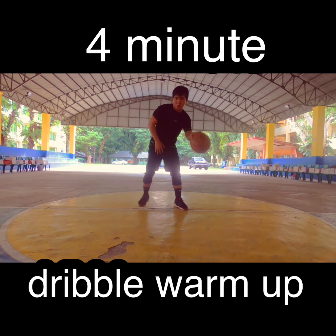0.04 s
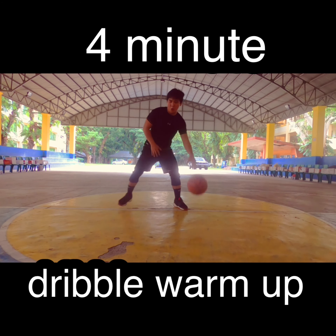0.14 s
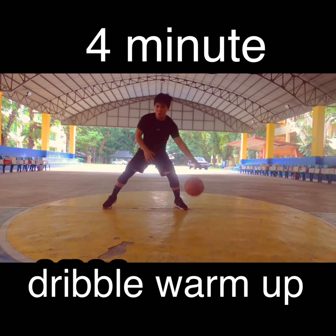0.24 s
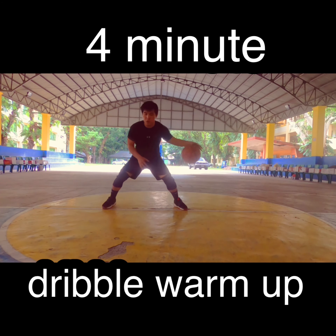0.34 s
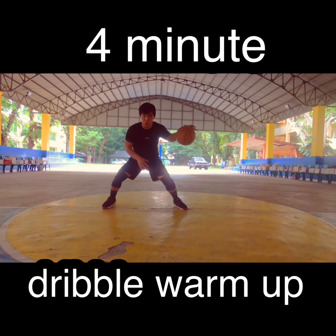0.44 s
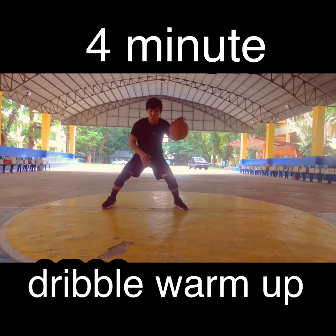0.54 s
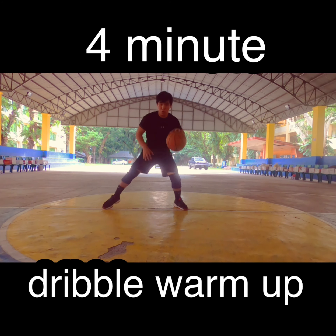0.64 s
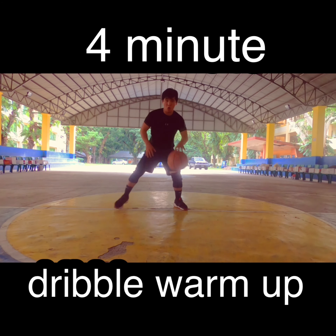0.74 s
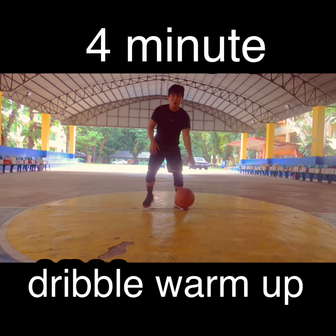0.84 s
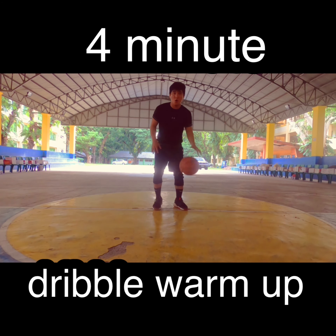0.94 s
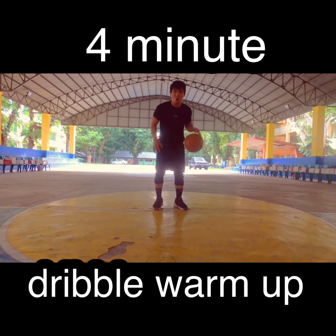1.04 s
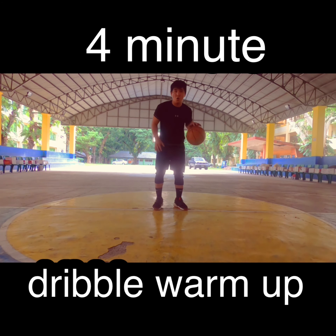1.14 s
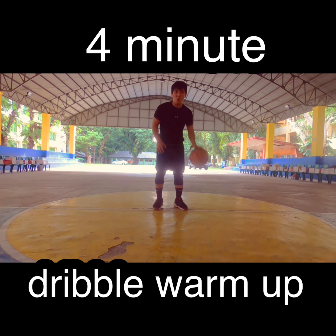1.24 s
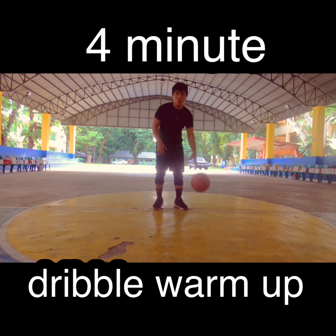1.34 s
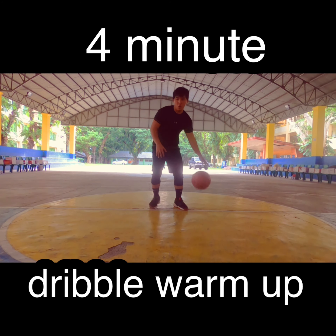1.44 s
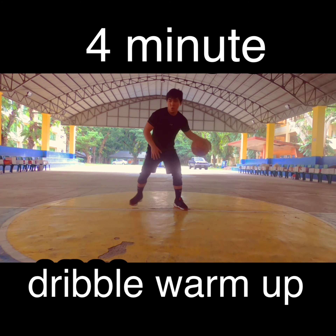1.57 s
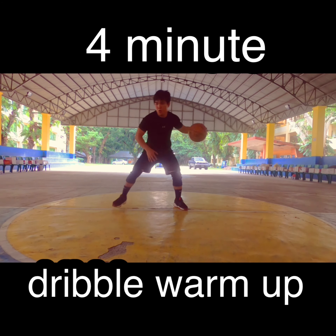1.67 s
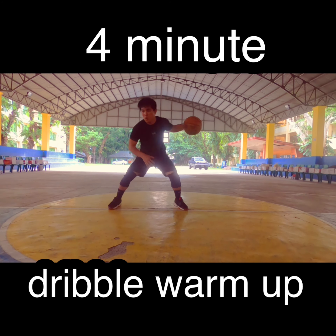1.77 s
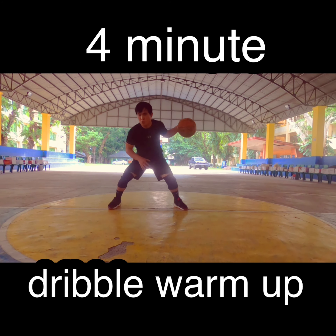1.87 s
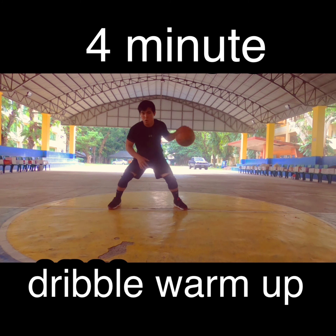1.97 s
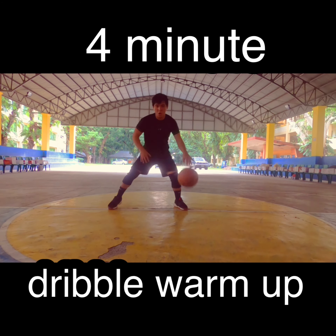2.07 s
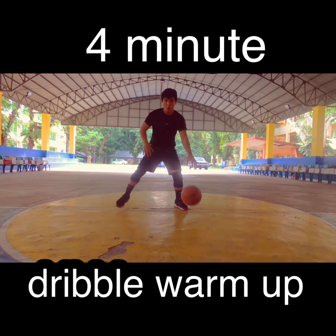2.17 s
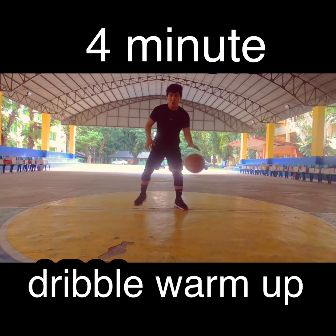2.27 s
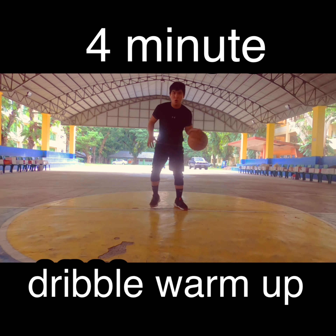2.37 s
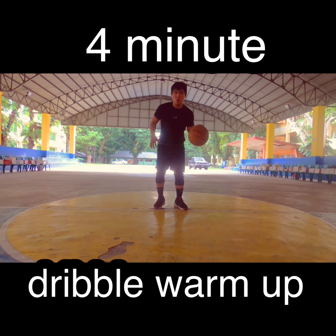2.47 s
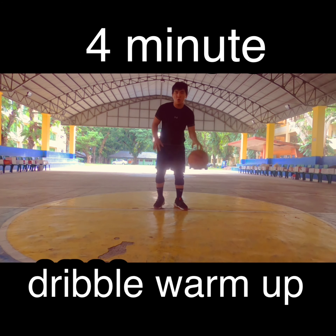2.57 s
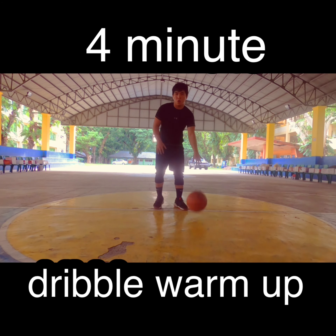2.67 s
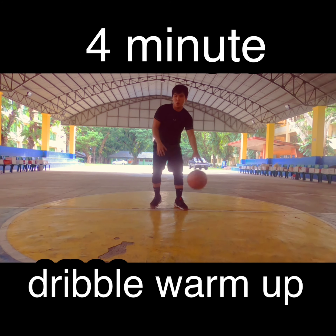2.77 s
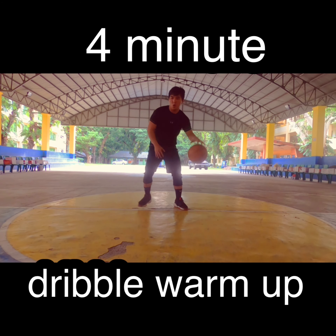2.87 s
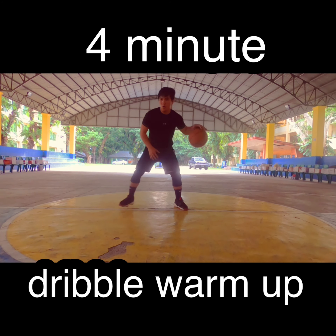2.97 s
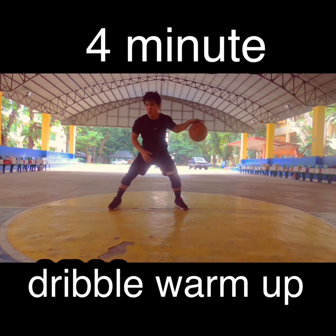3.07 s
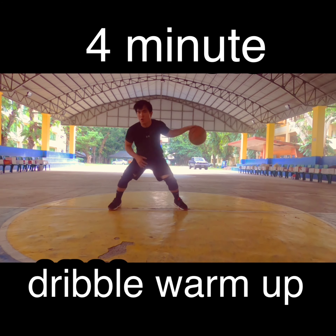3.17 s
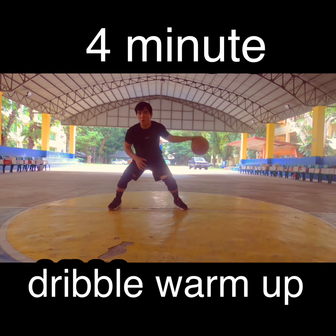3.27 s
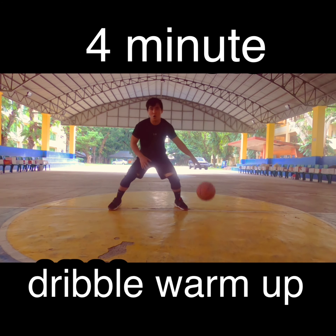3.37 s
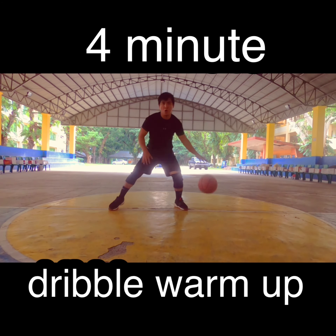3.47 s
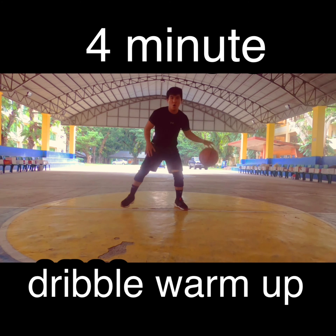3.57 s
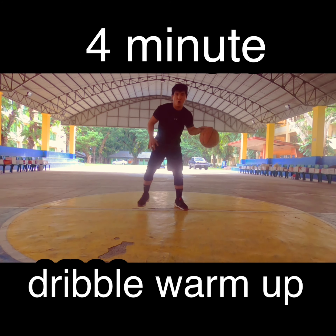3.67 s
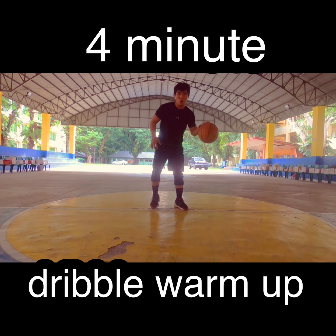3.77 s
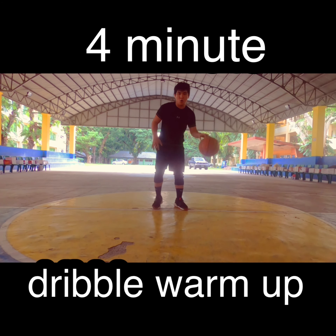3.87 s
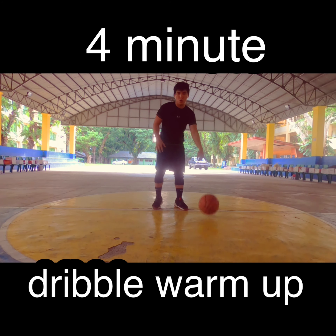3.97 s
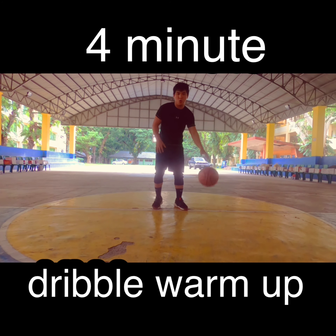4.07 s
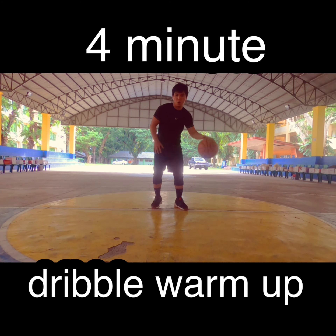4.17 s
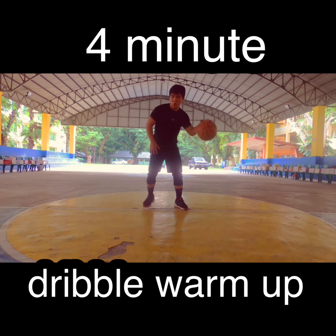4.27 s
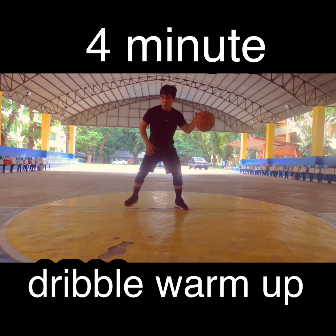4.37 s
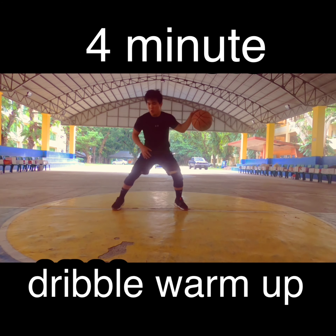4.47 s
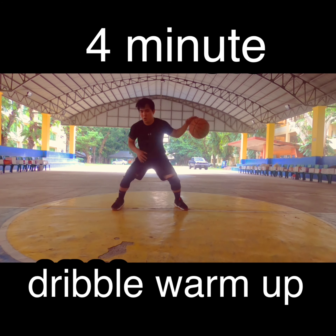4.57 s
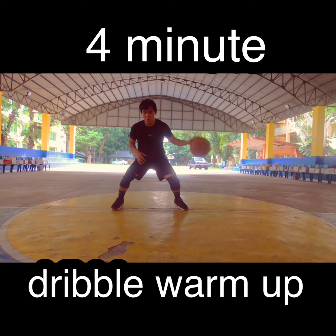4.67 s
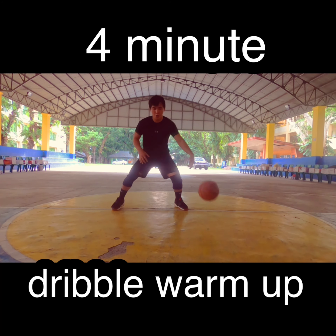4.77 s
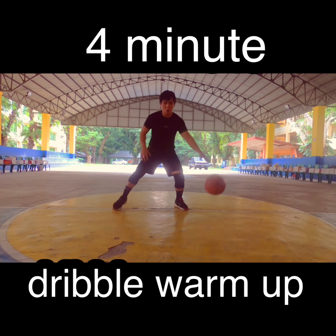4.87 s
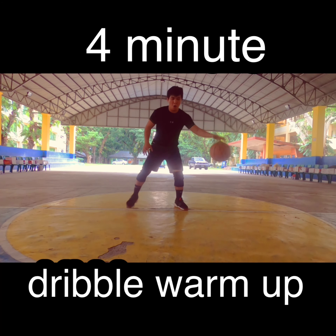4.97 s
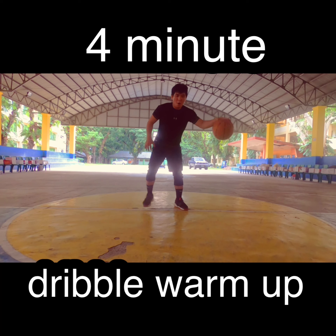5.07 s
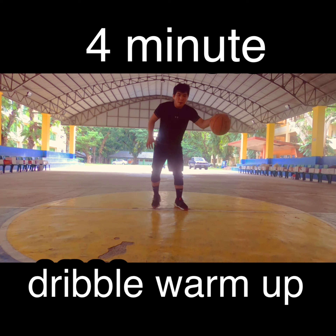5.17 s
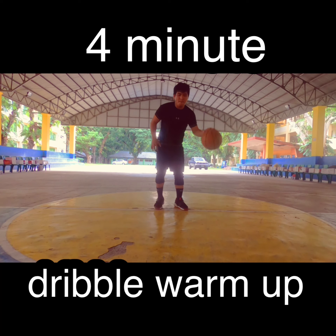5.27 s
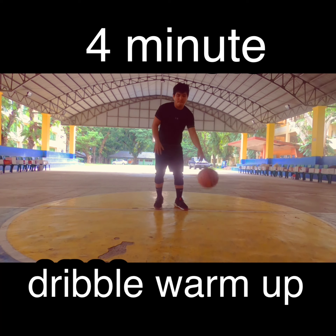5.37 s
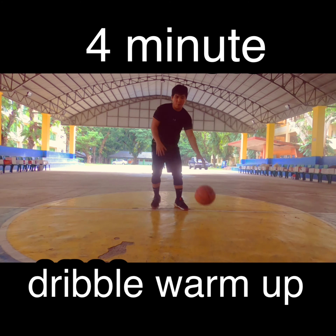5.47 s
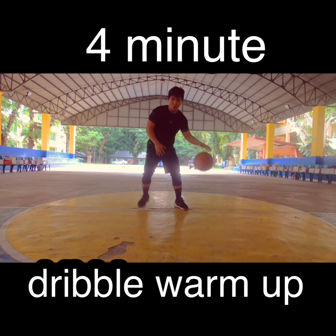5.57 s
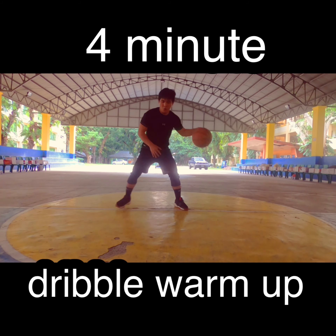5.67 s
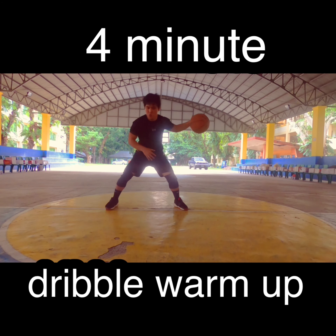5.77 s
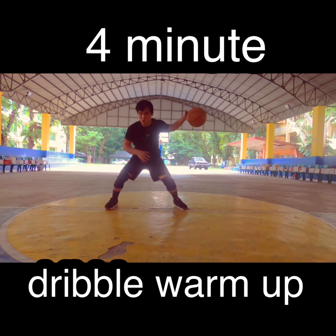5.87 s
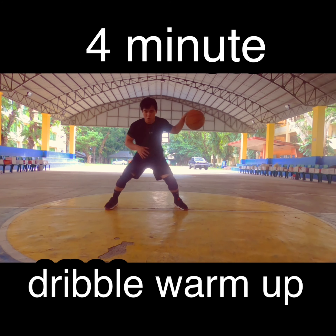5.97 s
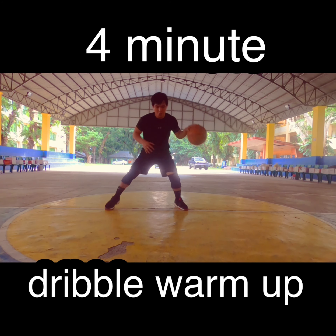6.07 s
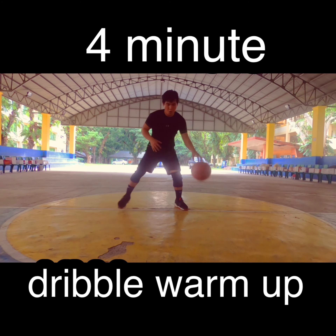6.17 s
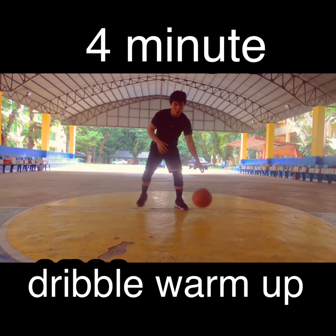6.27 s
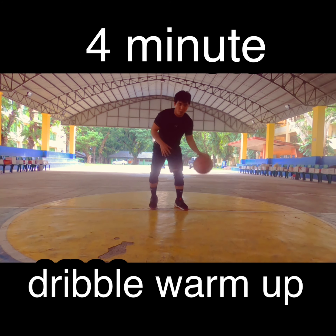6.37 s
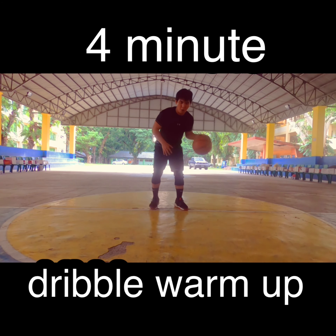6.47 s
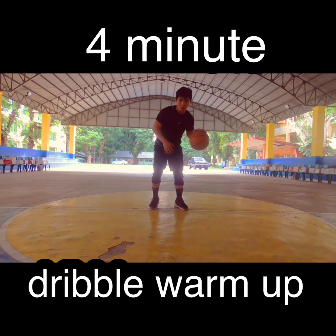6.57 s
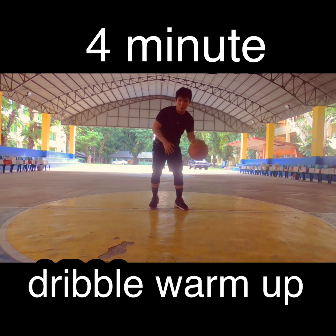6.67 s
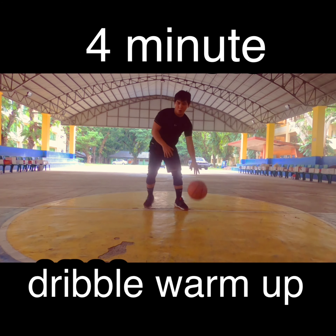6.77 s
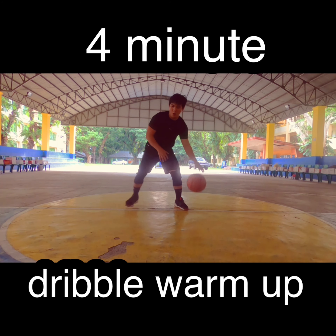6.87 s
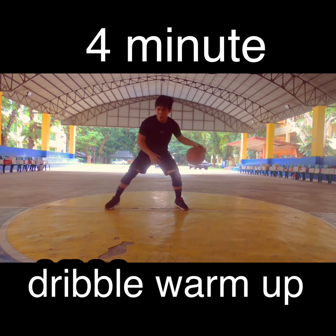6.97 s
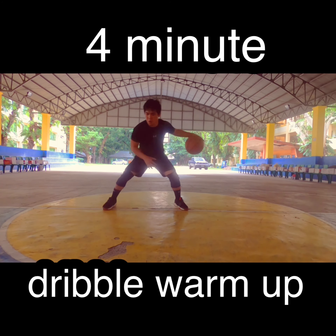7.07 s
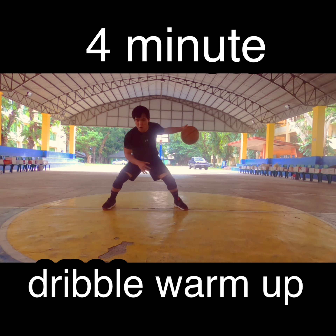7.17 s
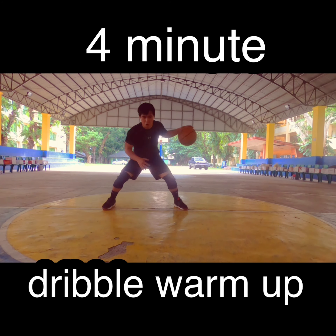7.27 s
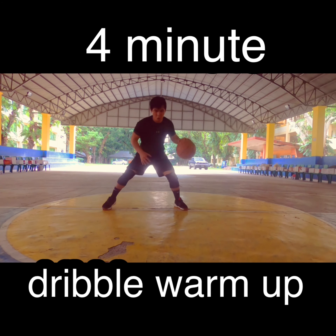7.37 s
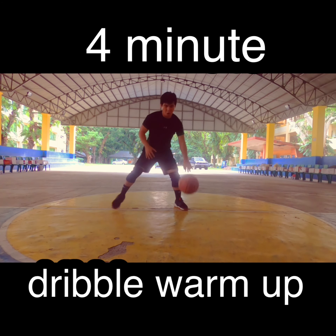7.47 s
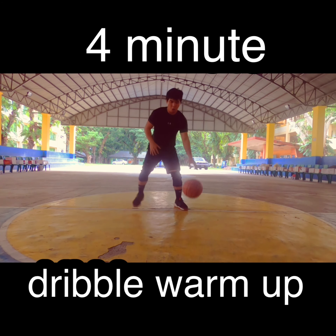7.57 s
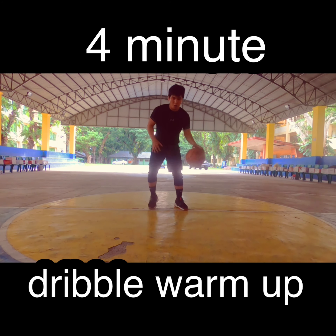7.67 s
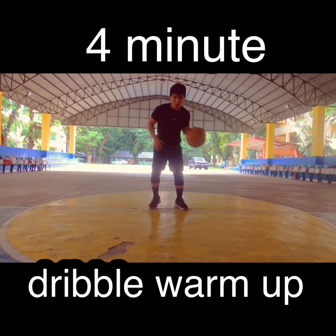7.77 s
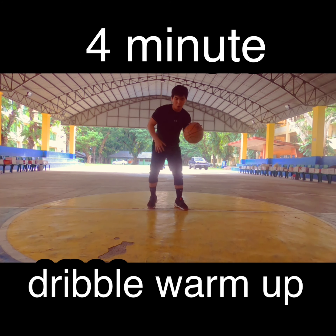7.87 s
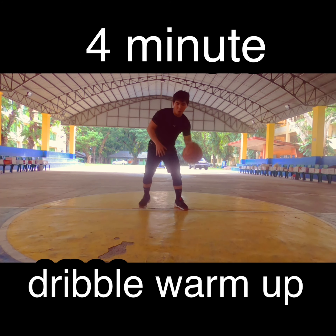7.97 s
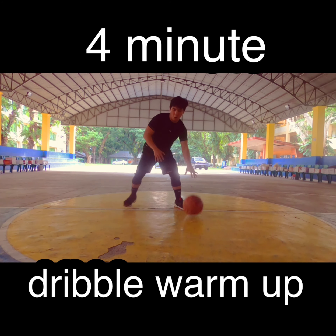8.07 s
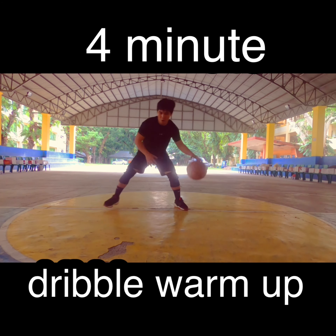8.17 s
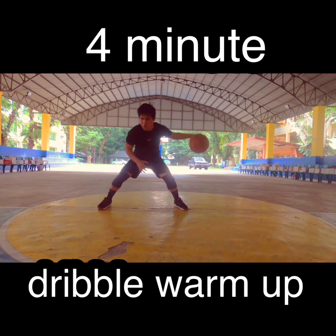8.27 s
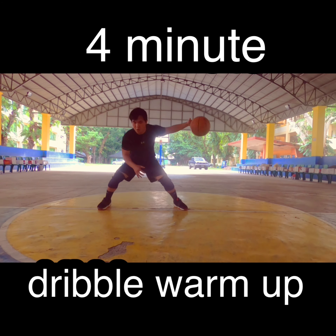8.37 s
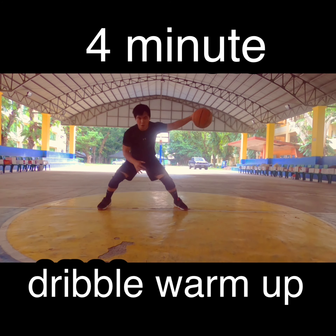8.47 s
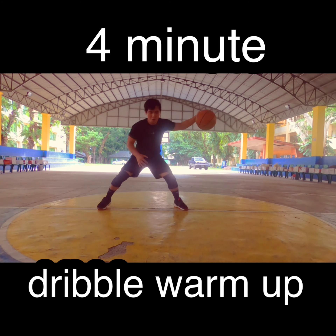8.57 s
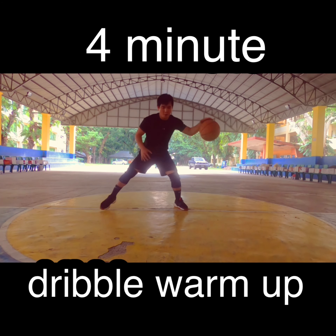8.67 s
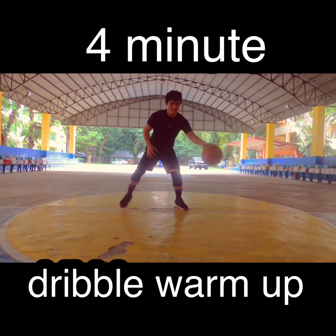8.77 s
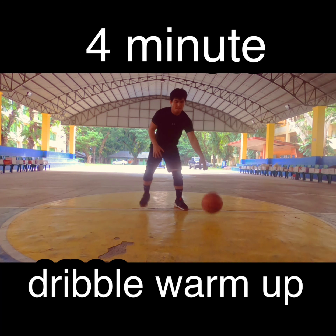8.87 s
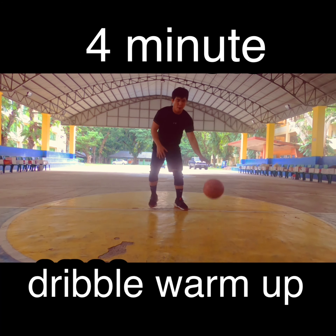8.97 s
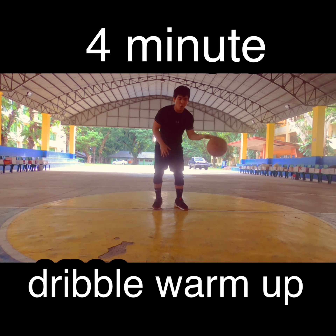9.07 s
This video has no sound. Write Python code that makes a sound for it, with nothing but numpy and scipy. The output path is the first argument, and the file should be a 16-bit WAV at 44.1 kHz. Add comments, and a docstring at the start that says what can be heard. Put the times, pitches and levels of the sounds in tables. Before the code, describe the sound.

A basketball is dribbled on concrete under a vaulted metal roof with open sides. The bounces come steadily, a little more than half a second apart, each a sharp slap and thump with a brief hollow ring, followed by fluttering echoes, a low hum and a long tail. A hand softly brushes the ball between some bounces. Faint birds and a low outdoor rumble continue behind, all heard from the front.

```python
"""A basketball is dribbled on concrete under a vaulted metal roof, open at the sides.
The scene opens in the tail of a bounce; from 0.3 s to 9 s the ball lands every 0.5-0.8 s.
Each time the skin slaps, the ball thumps and its air rings; then the vault returns a flutter of
echoes, a hum and a long tail. Between some bounces a hand brushes the ball. Throughout, birds chirp
faintly over an outdoor rumble; a faint, high hiss dies away near 6 s and is back near 8 s."""
import sys
import numpy as np
from scipy import signal
from scipy.fft import rfft
from scipy.io import wavfile
from scipy.ndimage import uniform_filter1d

SR = 44100
rng = np.random.default_rng(int(sys.argv[2]) if len(sys.argv) > 2 else 0)


def put_to_file(sound):
    """Save the sound as 16-bit audio at rate SR, in the file named by the first command-line argument."""
    columns = np.atleast_2d(sound).T  # one column per channel
    safe = np.clip(columns, -1, 1)
    whole_steps = np.round(safe * 32767)
    wavfile.write(sys.argv[1], SR, whole_steps.astype(np.int16))


N = 402633


def dribble(thump_db=-11, thump_lag_s=0.00179, slap_lead_s=0.001067, pock_db=0.5,
            hall_treble_share=0.65, slap_share=0.13, pock_echo_gain=2.4, steady_hz=700):
    """Bounces on one spot: long waves meet the same hall each time, short ones a new one."""
    # one row a bounce: (time [s], strength [dB], knock [dB], slap [dB], sizzle [dB])
    bounces = [(-.24, 1.5, -2, 3, -7), (0.3332, 1, -1.5, 0.5, -2.5), (0.9618, 0.7, 2, 1.5, 4.5),
               (1.5107, -0.35, -4, 4.5, 3), (2.2889, 1.5, -1, 1.5, -1.5), (2.8381, -.3, 1.5, 0.5, 3),
               (3.5579, 0.5, -1, 3.5, 5), (4.1335, 1.5, -1, 2.5, -6.5), (4.9629, 1.9, 0.5, 0, 5.5),
               (5.592, 0.5, -2, 5, 5), (6.4039, 1.3, 2.5, -7.5, -2), (6.9292, 1.2, 0, 3.5, 1),
               (7.6432, 1.75, 7.5, -1.5, 1), (8.2009, 1.3, -1, -4.5, 1.5), (9.009, 1.3, -6.5, 2.5, 1.5)]
    out = np.zeros(N)
    steady = cut(rng.standard_normal(2 * SR), steady_hz, "low")
    for time_s, strength_db, knock_db, *treble_db in bounces:
        start_s = time_s - slap_lead_s
        # slap and sizzle are beamed: the hall hears only a share of their changes
        facing, strike = [
            crack(strength_db + np.r_[0, pock_db, knock_db, share * np.array(treble_db)], share)
            for share in (1, hall_treble_share)]
        pock = cavity(strength_db + pock_db)
        smack = slap(strike)
        body = pock.copy()
        add(body, slap_lead_s + thump_lag_s, thump(thump_db + strength_db))
        add(out, start_s, body)
        add(out, start_s, slap(facing))
        # the hall hears the ball from all sides, so the laps partly average out
        add(body, slap_lead_s, (1 - slap_share) * strike)
        add(body, 0, slap_share * smack)
        add(out, start_s, low_echoes(body))
        upward = pock_echo_gain * pock
        add(upward, 0, strike + cut(smack, 1600, "low"))
        add(out, time_s, signal.fftconvolve(upward, flutter()))
        grain = steady + cut(rng.standard_normal(2 * SR), steady_hz, "high")
        add(out, start_s, signal.fftconvolve(body, tail(grain)))
        add(out, time_s, boom(strength_db))
    return out


def crack(colour_db, directness, gain_db=9, ragged_db=3):
    """Skin strikes concrete; the patch that lands sets the colour, ragged along any one direction."""
    # impact spectrum: (frequency [Hz], relative level [dB])
    spectrum = [(100, -18), (250, 11.5), (440, 4), (680, -25), (1080, 11), (1700, -3), (2250, 0.5),
                (2750, -2), (3300, -1), (4500, -5.5), (6300, -13.5), (8000, -18.5), (9400, -14.5),
                (12000, -28), (16000, -42)]
    # bass, pock, knock, slap and sizzle bands: (frequency [Hz])
    bands_hz = [200, 1000, 1500, 3200, 9000]
    hz = np.fft.rfftfreq(4096, 1 / SR)
    ragged = directness ** 2 * wander(len(hz), 24) * hz / (hz + 1000)
    patch_db = read(list(zip(bands_hz, colour_db)), hz)
    return -gain_of(gain_db) * click(read(spectrum, hz) + patch_db + ragged_db * ragged)


def slap(strike, gain_db=-1, touch_db=-15, lap_s=0.000941, lap_gain=0.3, lift_s=0.0112, lift_db=-11,
         grit_db=-7, grit_hz=1390, grit_decay_s=0.007):
    """The crack laps the ball and returns softly at lift-off; the pebbled skin crunches flat."""
    out = np.zeros(len(strike))
    add(out, 0, gain_of(touch_db) * strike)
    for lap in range(5):
        add(out, (lap + 1) * lap_s, lap_gain ** lap * strike)
    add(out, lift_s, gain_of(lift_db) * cut(strike, 2200, "low"))
    t = np.arange(len(out)) / SR
    crunch = cut(rng.standard_normal(len(t)), grit_hz, "high") * np.exp(-t / grit_decay_s)
    add(out, 0, gain_of(grit_db) * signal.fftconvolve(strike, crunch / np.linalg.norm(crunch)))
    return gain_of(gain_db) * out


def thump(peak_db, contact_s=0.0121, stiffness=2.457, skew=0.88, leak_hz=61.6):
    """The ball flattens and springs back; it radiates the acceleration of its volume."""
    t = np.arange(4096) / SR
    squash = np.sin(np.pi * np.clip(t / contact_s, 0, 1) ** skew) ** stiffness
    pressure = cut(-np.gradient(np.gradient(squash)), leak_hz, "high")
    return gain_of(peak_db) * pressure / abs(pressure).max()


def cavity(strength_db, gain_db=-8):
    """The air inside the ball rings briefly: a hollow pock near 1 kHz."""
    # air modes: (frequency [Hz], relative level [dB], t60 [s])
    modes = [(970, -65, .12), (910, -54, 0.01), (1138, -20.5, 0.048), (1744, -29.5, 0.037),
             (2040, -39.5, 0.023)]
    t = np.arange(SR // 8) / SR
    return sum(gain_of(gain_db + strength_db + mode_db - 60 * t / t60_s) * np.sin(2 * np.pi * hz * t)
               for hz, mode_db, t60_s in modes)


def low_echoes(body, lowpass_hz=560, trip_s=0.0409, trip_loss_db=8.5):
    """Long waves reflect whole, then shuttle under the vault, inverted each trip by its focus."""
    # early reflections from stands and vault: (delay [s], level [dB])
    reflections = [(0.0245, -14.5), (0.0397, -9), (0.0572, -8), (0.0879, -10), (.0984, -5.5), (0.1104, -16),
                   (0.1896, -11)]
    out = np.zeros(SR // 2)
    low = cut(body, lowpass_hz, "low")
    for delay_s, db in reflections:
        for trip in range(4):
            add(out, delay_s + trip * trip_s, (-1) ** trip * gain_of(db - trip * trip_loss_db) * low)
    return out


def flutter(first_s=0.0412, first_db=-2, trip_s=0.0482, trip_loss_db=4.5, scatter=0.52, mirror=0.16,
            dull_hz=3100, dulling=0.97, spread_s=0.001885, widening=1.25):
    """Floor-to-vault echoes, each trailed by a zing; every trip the trusses smear and dull them more."""
    t = np.arange(SR // 25) / SR
    out = np.zeros(SR // 3)
    for trip in range(6):
        delay_s = first_s + trip * trip_s
        db = first_db - trip * trip_loss_db
        width_s = spread_s * widening ** trip
        smear = rng.standard_normal(len(t)) * np.exp(-t / width_s)
        smear *= scatter / np.linalg.norm(smear)
        smear[0] += mirror
        add(out, delay_s - width_s / 2, gain_of(db) * cut(smear, dull_hz * dulling ** trip, "low"))
        out += zing(delay_s, db)
    return out


def zing(delay_s, echo_db, rib_hz=2700, gain_db=-36.5, rise_s=0.014, decay_s=0.014, octave_db=-3,
         rough=0.5, uneven=0.01):
    """Echoes from successive corrugations arrive ever further apart: a rough falling whistle."""
    t = np.arange(SR // 3) / SR
    slant = np.sqrt(np.clip(1 - (delay_s / (t + 1e-9)) ** 2, 0.1, 1))
    jitter, grain = wander((2, len(t)), 60)
    hz = rib_hz * rng.uniform(0.95, 1.04) * (1 + uneven * jitter) / slant
    age_s = np.maximum(t - delay_s, 0)
    swell = np.minimum(age_s / rise_s, 1) ** 2 * np.exp(-age_s / decay_s) * (1 + rough * grain)
    return gain_of(gain_db + echo_db) * swell * whistle(hz, octave_db)


def tail(grain, gain_db=-41.5, onset_s=0.036, build_s=0.0039, before_gain=0.48, early_db=4,
         early_decay_s=0.02, bass_hz=330, bass_build_s=0.097):
    """Diffuse hall response: it swells with the first roof echo; each band dies at its own rate."""
    # hall colour: (frequency [Hz], relative level [dB])
    spectrum = [(45, -11), (100, 4), (175, -3), (245, -3.5), (310, 3), (400, 1), (520, -3), (650, 9.5),
                (1000, 5), (1600, 1.5), (2200, -2), (4000, 1), (9000, 1.5), (15000, 1.5)]
    # hall decay: (frequency [Hz], t60 [s])
    decay = [(60, 0.87), (250, 3.57), (1000, 1.84), (3500, 1.82), (6000, 1.52), (9000, 1.01), (14000, 0.83)]
    hz, frame_s, bands = signal.stft(grain, SR, nperseg=512)
    bands *= gain_of(read(spectrum, hz)[:, None] - 60 * frame_s / read(decay, hz)[:, None])
    # long waves stay separate reflections for a while before they turn diffuse
    long_wave = 1 / (1 + (hz[:, None] / bass_hz) ** 4)
    bands *= 1 - long_wave * np.clip(1 - frame_s / bass_build_s, 0, 1)
    wave = signal.istft(bands, SR, nperseg=512)[1][:len(grain)]
    t = np.arange(len(wave)) / SR
    swell = before_gain + (1 - before_gain) * np.clip((t - onset_s) / build_s, 0, 1)
    return wave * swell * gain_of(gain_db + early_db * np.exp(-t / early_decay_s))


def boom(strength_db, gain_db=15, onset_s=0.014, build_s=0.01):
    """The thump sets the air under the vault humming."""
    # resonances under the roof: (frequency [Hz], relative level [dB], t60 [s])
    modes = [(120.9, -41, 1.26), (200.7, -45, 0.53), (231.3, -46, 0.97), (268.2, -45, 0.39),
             (399.6, -52.5, 1.71)]
    t = np.arange(SR) / SR
    hum = sum(gain_of(mode_db - 60 * t / t60_s) * np.sin(2 * np.pi * (hz * t + rng.random()))
              for hz, mode_db, t60_s in modes)
    return gain_of(gain_db + strength_db) * hum * np.clip((t - onset_s) / build_s, 0, 1)


def hands(grit=0.35):
    """The palm drags over the pebbled skin."""
    # catches of the ball: (time [s], length [s], level [dB], tilt [dB per 10 kHz])
    brushes = [(0.7, .05, -66, 10), (1.842, 0.023, -45.5, -18), (3.172, .05, -60, 4),
               (4.58, 0.06, -43, -14), (5.851, 0.075, -53, 0), (6.245, 0.013, -59, 12),
               (7.46, .012, -58, 7)]
    # friction spectrum: (frequency [Hz], relative level [dB])
    spectrum = [(300, -2), (1400, -4), (2200, 6.5), (4000, -2), (7000, -8), (11000, -10), (16000, -29)]
    out = np.zeros(N)
    for time_s, length_s, db, tilt_db in brushes:
        rub = noise([(hz, band_db + tilt_db * hz / 10000) for hz, band_db in spectrum], SR // 4)
        rub *= np.exp(grit * wander(len(rub), 60))
        stroke = np.hanning(round(length_s * SR))
        add(out, time_s, gain_of(db) * unit_rms(rub)[:len(stroke)] * stroke)
    return out


def birds(fall_hz=228, fall_s=0.053, waver=0.017, rasp_s=0.0011, octave_db=-26, dry_db=-6, wet_db=-2):
    """Distant birds under the roof: short chirps rasp and fall, long whistles waver."""
    # nearer calls: (time [s], length [s], pitch [Hz], relative level [dB])
    chirps = [(0.707, 0.25, 3350, -50), (0.893, 0.023, 5350, -46), (1.131, .25, 5260, -48.5),
              (1.284, 0.2, 3020, -47), (1.358, 0.041, 4100, -41), (1.882, 0.28, 2790, -54),
              (2.035, 0.15, 5180, -46), (2.675, 0.13, 5390, -42.5), (3.113, .068, 4020, -46),
              (4.07, 0.034, 5200, -41), (4.672, 0.096, 3250, -43.5), (4.755, 0.068, 4240, -42.5),
              (5.52, 0.089, 5850, -51), (6.12, 0.066, 5660, -50.5), (6.853, 0.075, 4010, -44),
              (7.391, 0.07, 5740, -50), (8.764, 0.073, 4110, -44.5)]
    out = np.zeros(N)
    for time_s, length_s, pitch_hz, db in chirps + far_calls():
        size = round(length_s * SR)
        hz = pitch_hz + fall_hz * fall_s / length_s * np.linspace(0.5, -0.5, size)
        hz *= 1 + (waver + rasp_s / length_s) * wander(SR // 2, 70)[:size]
        add(out, time_s, gain_of(db) * whistle(hz, octave_db) * signal.windows.tukey(size, 0.5))
    reverb = signal.fftconvolve(out, tail(rng.standard_normal(2 * SR)))[:N]
    return gain_of(dry_db) * out + gain_of(wet_db) * reverb


def far_calls(count=24, calls_per_s=1.2, length_s=0.06, low_hz=3000, high_hz=5800, db=-55):
    """Birds farther off: chirp rows at random times and pitches."""
    wait, pitch = rng.random((count, 2)).T
    times_s = np.cumsum(-np.log(1 - wait)) / calls_per_s
    pitches_hz = low_hz + pitch * (high_hz - low_hz)
    return [(time_s, length_s, hz, db) for time_s, hz in zip(times_s, pitches_hz)]


def outdoors(rumble_db=-43, hiss_gain_db=-5):
    """Distant rumble and a faint, high outdoor hiss that comes and goes."""
    # outdoor rumble: (frequency [Hz], relative level [dB])
    rumble_spectrum = [(15, -47), (25, 6.5), (60, 5.5), (106, -2), (181, -10.5), (237, -4), (415, -9),
                       (673, -28.5), (1000, -9.5), (1670, -25.5), (4260, -30), (7280, -42.5), (9270, -42.5),
                       (13500, -70), (15000, -83)]
    # outdoor hiss: (frequency [Hz], relative level [dB])
    hiss_spectrum = [(800, -35), (2000, -6.5), (3300, -3.5), (5000, -11.5), (7000, -22.5), (10000, -30),
                     (14000, -47)]
    # swell of the hiss: (time [s], relative level [dB])
    hiss_swell = [(0.0, -50.5), (5.88, -52.5), (6.21, -83), (7.93, -47), (8.77, -68), (9.1, -60)]
    hiss_db = hiss_gain_db + np.interp(np.arange(N) / SR, *np.transpose(hiss_swell))
    return gain_of(rumble_db) * noise(rumble_spectrum, N) + gain_of(hiss_db) * noise(hiss_spectrum, N)


def gain_of(db):
    """Decibels to gain."""
    return 10 ** (np.asarray(db) / 20)


def unit_rms(x):
    """Scales to an rms of one."""
    return x / np.sqrt(np.mean(x ** 2) + 1e-20)


def read(points, hz):
    """Interpolates on a log-frequency axis."""
    points_hz, values = np.transpose(points)
    return np.interp(np.log(hz + 1), np.log(points_hz + 1), values)


def add(mix, time_s, sound):
    """Mixes a sound in; what lies outside is dropped."""
    at = round(time_s * SR)
    sound = sound[max(-at, 0):]
    part = mix[max(at, 0):][:len(sound)]
    part += sound[:len(part)]


def cut(x, hz, kind, order=2):
    """High-pass or low-pass."""
    return signal.sosfilt(signal.butter(order, hz, kind, fs=SR, output="sos"), x)


def noise(spectrum, size):
    """Unit-rms noise with a given spectrum."""
    gain = gain_of(read(spectrum, np.fft.rfftfreq(size, 1 / SR)))
    return unit_rms(np.fft.irfft(rfft(rng.standard_normal(size)) * gain, size))


def wander(shape, smooth_points):
    """Unit-rms smoothed noise."""
    return unit_rms(uniform_filter1d(rng.standard_normal(shape), smooth_points))


def whistle(hz, octave_db):
    """Gliding sine plus its octave."""
    phase = 2 * np.pi * np.cumsum(hz) / SR
    return np.sin(phase) + gain_of(octave_db) * np.sin(2 * phase)


def click(spectrum_db):
    """Minimum-phase pulse with a given spectrum."""
    log_gain = np.log(gain_of(np.r_[spectrum_db, spectrum_db[-2:0:-1]]))
    return np.fft.ifft(np.exp(np.conj(signal.hilbert(log_gain)))).real


def scene(side_db=-38):
    """All sound arrives from the front; only the treble differs slightly between left and right."""
    mid = dribble() + hands() + birds() + outdoors()
    side = gain_of(side_db) * cut(np.roll(mid, shift=8), 4000, "high", order=4)
    return np.array([mid - side, mid + side])


def record(dry, dip_hz=676, dip_width_hz=204, dip_depth=0.79, ceiling=0.77, edge_hz=15850):
    """The microphone sheds deep bass, dips in the low mids and rounds peaks; then a band limit."""
    thinned = cut(dry, 20, "high", order=1)
    dip_band = signal.lfilter(*signal.iirpeak(dip_hz, dip_hz / dip_width_hz, fs=SR), thinned)
    rounded = ceiling * np.tanh((thinned - dip_depth * dip_band) / ceiling)
    lowpass = signal.firwin(511, edge_hz, window=("kaiser", 9), fs=SR)
    return signal.oaconvolve(rounded, lowpass[None], "same")


dry = scene()
out = record(dry)
put_to_file(out)
```